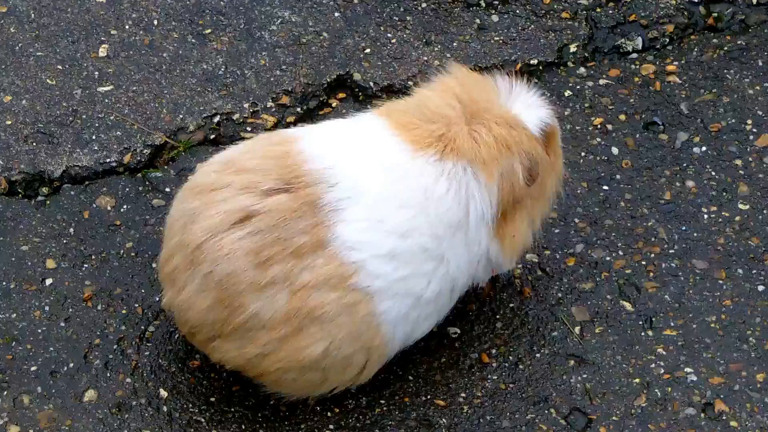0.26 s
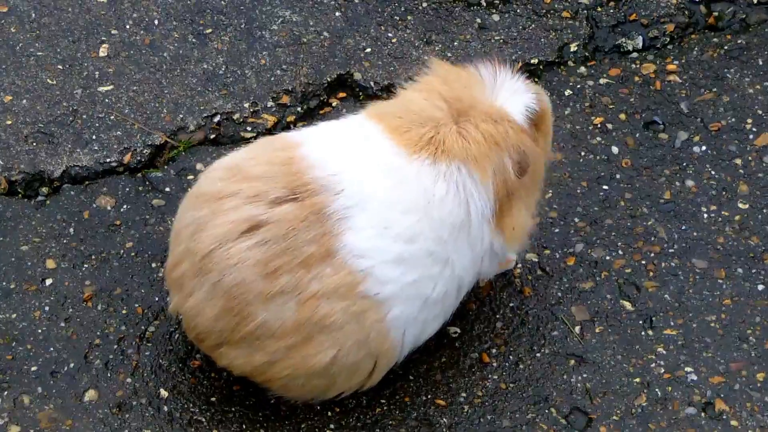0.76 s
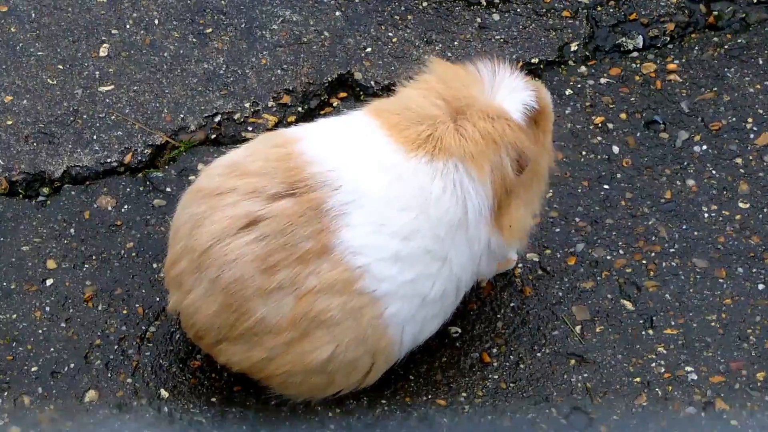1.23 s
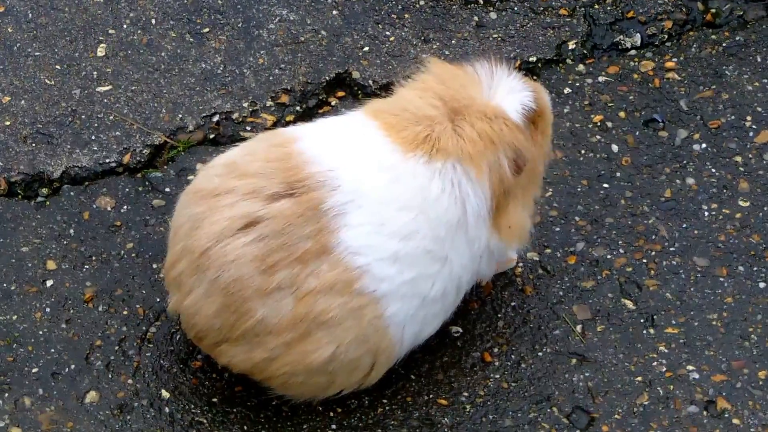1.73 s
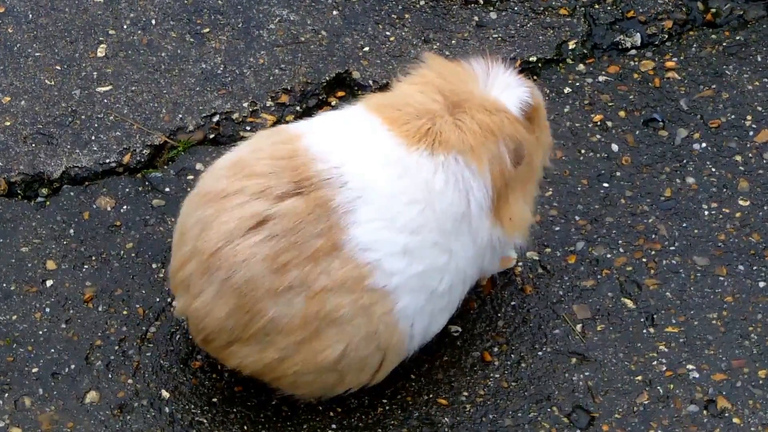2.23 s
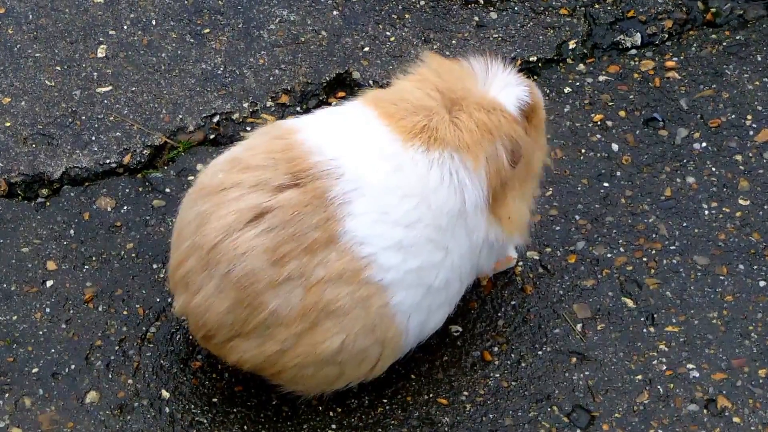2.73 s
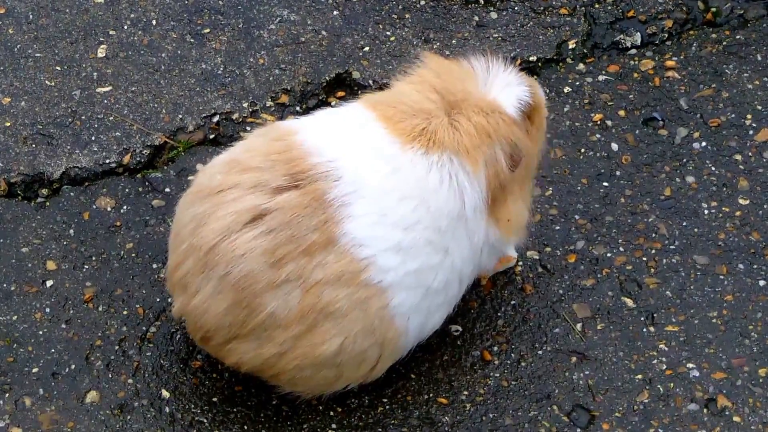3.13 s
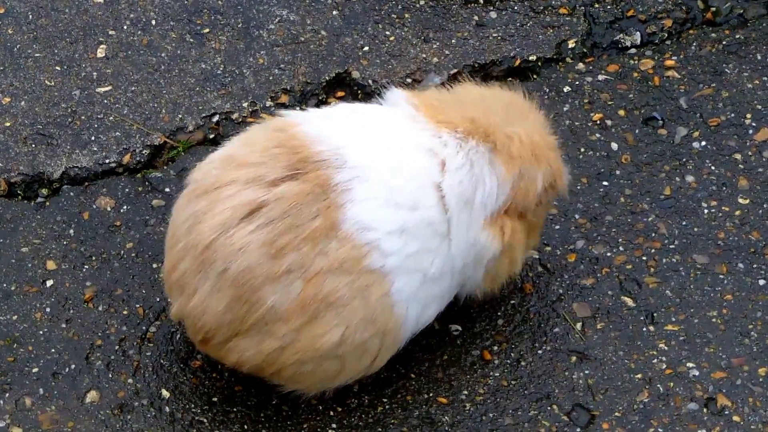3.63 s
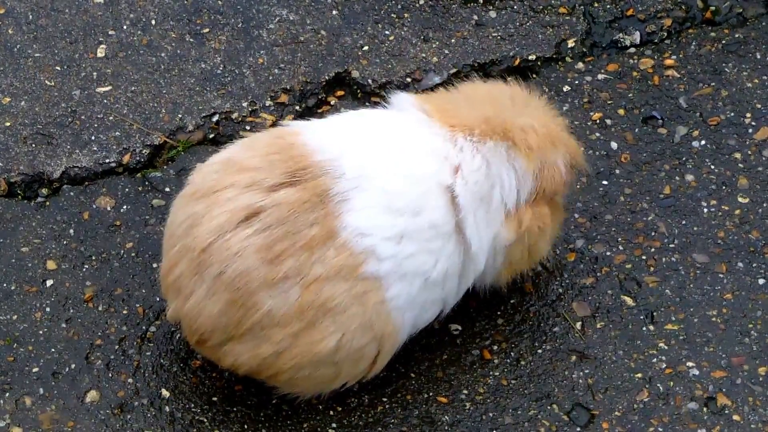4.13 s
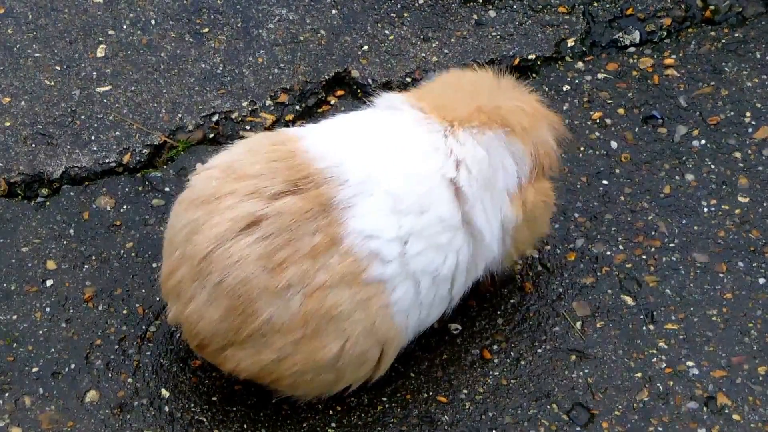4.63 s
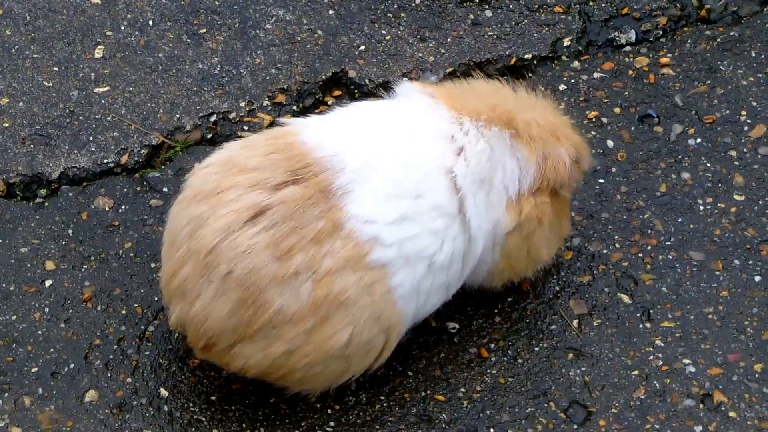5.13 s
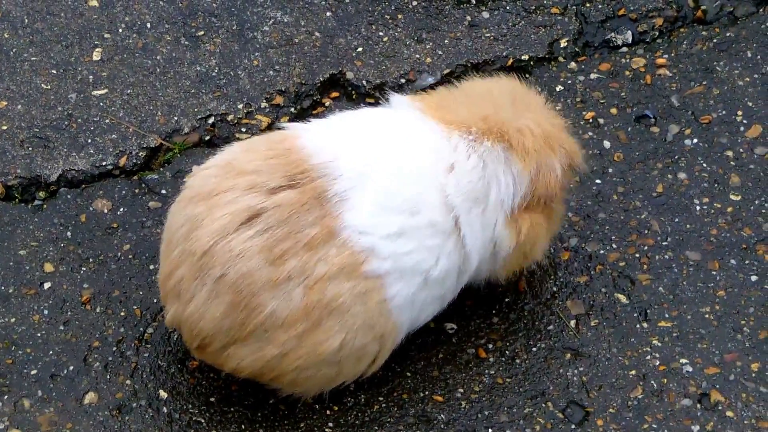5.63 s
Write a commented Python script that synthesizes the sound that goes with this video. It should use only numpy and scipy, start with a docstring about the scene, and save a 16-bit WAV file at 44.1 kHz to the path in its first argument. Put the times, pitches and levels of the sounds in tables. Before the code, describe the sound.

A quiet outdoor scene among houses is heard from a hand-held camera, with a soft, steady hiss throughout. In the first second, gulls cry faintly far away and fingers rustle and tick right at the microphone; the distant calls return now and then. From about 1.1 seconds a small songbird repeats a high whistled pip, fast trill and falling slur, roughly four times a second, echoing lightly off the walls until about 5.5 seconds. Five high, buzzy, warbling squeals, like young birds begging, each rise in pitch and last about a third of a second, at 1.0, 1.4, 2.2, 3.4 and 4.9 seconds. The grip scrapes, crackles and softly knocks hardest from 3.4 to 4.2 seconds, then continues more lightly, with the sharpest tick at 5.3 seconds. From 5.5 to 5.8 seconds a bird gives a swelling, rattling churr of quick pulses, followed by one last faint chirp.

```python
"""Outdoors among houses, heard from the microphone of a hand-held camera, with birds near and far.
First come soft hiss, fingers rustling and ticking on the camera, and gulls crying far off.
From one second in come five high, buzzy, warbling squeals, like young starlings begging,
while a small songbird repeats a whistled pip, trill and falling slur that the walls echo.
Past halfway the grip scrapes hardest; at the end a bird gives a rattling churr of quick pulses."""
import sys
import numpy as np
from scipy import signal
from scipy.fft import rfft, irfft, next_fast_len
from scipy.io import wavfile
from scipy.ndimage import uniform_filter1d

SR = 44100
rng = np.random.default_rng(int(sys.argv[2]) if len(sys.argv) > 2 else 0)


def store_pcm(level_fs):
    """Save levels as 16-bit WAV."""
    pcm = np.round(np.clip(level_fs, -1, 1) * 32767).astype(np.int16)
    wavfile.write(sys.argv[1], SR, np.atleast_2d(pcm).T)


N = 258867
TIME = np.arange(N) / SR


def amp(db):
    return 10 ** (np.asarray(db) / 20)


def unit_rms(x):
    return x / np.sqrt(np.mean(x ** 2) + 1e-20)


def value_at(points, hz):
    """Reads a curve of (hz, value) points on a log frequency axis."""
    point_hz, value = np.transpose(points)
    return np.interp(np.log(hz + 1), np.log(point_hz + 1), value)


def colour(x, points):
    """Filters x by a spectrum of (hz, db) points."""
    size = next_fast_len(2 * len(x))
    gain = amp(value_at(points, np.fft.rfftfreq(size, 1 / SR)))
    return irfft(rfft(x, size) * gain, size)[:len(x)]


def wander(size, per_s):
    """Smooth random drift of rms about 1, changing about per_s times a second."""
    spectrum = rfft(rng.standard_normal(SR)) * np.exp(-(np.arange(SR // 2 + 1) / per_s) ** 2)
    return np.resize(unit_rms(irfft(spectrum)), size)


def follow(rows):
    """The times of a curve and its columns, sample by sample."""
    times, *columns = np.transpose(rows)
    t = np.arange(times[0], times[-1], 1 / SR)
    return t, *(np.interp(t, times, column) for column in columns)


def phase_of(hz):
    return 2 * np.pi * np.cumsum(hz) / SR


def fade(size, share):
    return signal.windows.tukey(size, share)


def envelope(t, length_s, attack_s, release_s):
    return np.clip(t / attack_s, 0, 1) * np.clip((length_s - t) / release_s, 0, 1)


def add(mix, start_s, sound):
    part = mix[max(round(start_s * SR), 0):][:len(sound)]
    part += sound[:len(part)]


def play(sounds):
    mix = np.zeros(N)
    for start_s, sound in sounds:
        add(mix, start_s, sound)
    return mix


# Decay of the echo between the houses: frequency_hz, t60_s
HOUSE_DECAY = [(500, 0.34), (4000, 1), (10000, 0.34)]
def yard(x, near_db, far_db, near_s=0.0034):
    """Sparse reflections: a quick scatter from near walls, a longer tail from the houses around."""
    taps = rng.standard_normal((2, SR)) * (rng.random((2, SR)) < 2000 / SR)
    near = taps[0] * np.exp(-TIME[:SR] / near_s) * (TIME[:SR] > .002)
    hz, t, spectra = signal.stft(taps[1], SR, nperseg=256)
    decay = amp(-60 * t / value_at(HOUSE_DECAY, hz)[:, None])
    far = signal.istft(spectra * decay * np.minimum(t / 0.017, 1), SR)[1][:SR]
    echo = amp(near_db) * near / np.linalg.norm(near) + amp(far_db) * far / np.linalg.norm(far)
    return (x + signal.fftconvolve(x, echo)[:N]) / np.sqrt(1 + np.sum(echo ** 2))


# Spectrum of the noise floor: frequency_hz, relative_db
HISS_COLOUR = [(15, -31), (28, -3), (60, -9.5), (130, -16.5), (200, -18), (320, -17), (545, -13),
               (850, -16.5), (1130, -11.5), (1500, -16.5), (5000, -17), (8600, -11.5), (11600, -21),
               (16000, -21)]
def hiss(level_db=-59.5):
    """Steady outdoor air and microphone hiss."""
    return amp(level_db) * unit_rms(colour(rng.standard_normal(N), HISS_COLOUR))


# Faint rasping birds in the distance: start_s, length_s, centre_hz, level_db
FAR_RASPS = [(.56, 0.071, 1836, -65), (2.597, 0.092, 3500, -62), (4.931, 0.041, 8350, -56.5),
             (5.449, 0.024, 4030, -57), (5.486, 0.022, 8700, -59)]
def rasp(start_s, length_s, centre_hz, level_db, width=0.16):
    """A toneless burst of noise around one pitch."""
    size = round(length_s * SR)
    band = wander(size, width * centre_hz) * np.sin(2 * np.pi * centre_hz * TIME[:size])
    return start_s, amp(level_db) * unit_rms(band * fade(size, 0.66))


# Gulls and other birds far off: start_s, length_s, top_hz, bend_ratio, level_db, octave_relative_db
FAR_CRIES = [(0, 0.12, 3550, .02, -68, -30), (.019, 0.054, 1230, 0.11, -59, -7),
             (0.37, 0.04, 5610, 0.046, -60.5, -30), (.385, 0.0545, 1294, 0.078, -61.5, -15),
             (0.478, 0.072, 1225, 0.077, -57, -10.5), (.47, 0.13, 1210, 0.029, -62, 0),
             (0.628, 0.17, 1150, 0.026, -65, 5), (0.972, 0.054, 1260, 0.087, -63.5, -15),
             (1.097, 0.03, 1176, 0.067, -59.5, -26), (1.5, 0.15, 1206, 0.014, -58.5, -15),
             (1.803, 0.031, 1320, 0.13, -61.5, -24), (2.519, 0.066, 1424, 0.11, -65, 1),
             (2.56, 0.097, 1145, 0.019, -65, -4), (2.674, 0.031, 2280, 0.035, -60.5, -30),
             (2.766, 0.04, 2280, 0.045, -61.5, -28), (2.884, 0.033, 2315, .03, -61.5, -30),
             (3.263, 0.043, 1374, 0.17, -62, -5), (4.245, 0.036, 1170, 0.047, -61.5, -20),
             (5.208, 0.036, 1409, 0.17, -62.5, -2), (5.32, .045, 1240, 0.065, -60, -32)]
def cry(start_s, length_s, top_hz, bend, level_db, octave_db, peak_share=0.332):
    """A distant note with its octave that arches early and falls away."""
    progress = np.linspace(0, 1, round(length_s * SR))
    hz = top_hz * (1 - bend * (2 * (progress - peak_share)) ** 2)
    phase = phase_of(hz * (1 + 0.0078 * wander(len(hz), 130)))
    tone = np.sin(phase) + amp(octave_db) * np.sin(2 * phase)
    return start_s, amp(level_db) * unit_rms(tone * fade(len(hz), 0.23))


def slips(per_s, spread_db=5.0):
    """Sliding skin: a random train of clicks, most small and a few large."""
    sizes = amp(spread_db * np.minimum(rng.exponential(1, N), 4)) * rng.choice([-1, 1], N)
    return unit_rms(sizes * (rng.random(N) < per_s / SR))


# Spectra of a light touch, a firm touch and their crackle: frequency_hz, relative_db
LIGHT_TOUCH = [(40, -27), (110, -8), (190, 5), (260, -3.5), (450, -7), (700, -11), (1100, -14), (1800, -12),
               (7000, -35), (15000, -76)]
FIRM_TOUCH = [(40, -48), (120, -74), (220, -3.5), (430, -7.5), (700, -14.5), (1100, -19.5), (1800, -32.5),
              (7000, -88), (15000, -40)]
CRACKLE_COLOUR = [(300, 14), (1200, 9), (3000, 22.5), (7000, 12.5), (11000, -2.5), (15500, 0.5)]
# The grip shifts, right at the microphone: start_s, length_s, rub_db, crackle_relative_db
GRIP_SHIFTS = [(0, 0.17, -60, -52), (0.678, 0.066, -62, -66), (0.796, 0.15, -57.5, -63),
               (0.969, .29, -57.5, -54), (1.653, 0.36, -57.5, -44), (2.019, 0.17, -67, -50.5),
               (3.405, 0.27, -52.5, -45), (3.651, 0.31, -47, -45), (3.958, .27, -52.5, -46),
               (4.308, 0.49, -55.5, -46.5), (4.889, 0.36, -57, -52), (5.304, 0.077, -60, -52),
               (5.442, .28, -63, -66)]
def rubbing(resting_db=-75.5, firm_db=-49, grit_db=-19, resting_grit_db=-78, catches_per_s=43):
    """Fingers creep on the camera body: a light touch mumbles, a firm one scrapes and crackles."""
    level, crackle = amp(resting_db), amp(resting_grit_db)
    for start_s, length_s, rub_db, crackle_db in GRIP_SHIFTS:
        shift = envelope(TIME - start_s, length_s, attack_s=0.0027, release_s=0.035)
        level = level + shift * amp(rub_db)
        crackle = crackle + shift * amp(crackle_db + grit_db)
    drift = colour(rng.standard_normal(N), [(0, 0), (catches_per_s, 0), (2 * catches_per_s, -80)])
    catch = amp(5 * np.minimum(unit_rms(drift), 1))  # the fingers catch and let go
    level = level * catch
    firmness = 1 / (1 + (amp(firm_db) / level) ** 2)
    friction = slips(per_s=1100) + 0.32 * rng.standard_normal(N)
    mumble = (1 - firmness) * unit_rms(colour(friction, LIGHT_TOUCH))
    scrape = firmness * unit_rms(colour(friction, FIRM_TOUCH))
    grit = unit_rms(colour(slips(per_s=400), CRACKLE_COLOUR))
    return level * (mumble + scrape) + crackle * catch * grit


# The firmest knocks of the grip: start_s, crackle_peak_db, thud_db
GRIP_KNOCKS = [(.052, -40, -77), (0.375, -51, -66), (0.8936, -40.5, -54.5), (.97, -42, -60.5),
               (.995, -43, -55.5), (1.017, -45, -60), (1.0382, -43, -47.5), (1.664, -40, -55),
               (1.864, -43, -59), (1.895, -41, -56.5), (3.418, -41, -49.5), (3.439, -40, -45.5),
               (3.476, -40, -58), (3.543, -41, -44.5), (3.586, -39.5, -48.5), (3.672, -56, -50),
               (3.732, -35, -51), (3.755, -37.5, -44), (3.822, -49, -53), (3.965, -39, -45.5),
               (3.999, -37.5, -49), (4.047, -37, -57.5), (4.095, -41, -49), (4.377, -42, -53.5),
               (4.487, -42, -54.5), (4.537, -43, -47.5), (4.718, -51, -54.5), (4.749, -35, -60),
               (4.954, -38.5, -70), (5.058, -56, -54), (5.122, -56, -57.5), (5.208, -44, -66),
               (5.368, -39.5, -64), (5.564, -61, -64)]
def knock(start_s, crackle_db, thud_db, thud_s=0.0025, crackle_s=0.0015, thud_hz=400, scrape=0.86):
    """A firmer slip: a dull push rocks the housing for a few cycles, with a short crackle."""
    t = TIME[:SR // 30]
    push, grit = rng.standard_normal((2, len(t)))
    rock = np.sin(2 * np.pi * (thud_hz * rng.uniform(0.886, 1.274) * t + rng.random()))
    thud = (rock + scrape * unit_rms(colour(push, FIRM_TOUCH))) * t * np.exp(-t / thud_s)
    band = signal.butter(2, [900, 4500], "band", fs=SR, output="sos")
    crackle = signal.sosfilt(band, grit * t * np.exp(-t / crackle_s))
    return start_s, amp(thud_db) * unit_rms(thud) + amp(crackle_db) * crackle / abs(crackle).max()


# The sharpest ticks on the camera body: start_s, peak_db, ring_hz
BODY_TICKS = [(.529, -37, 4400), (.82, -36, 2970), (1.172, -37, 5000), (1.865, -37, 10300),
              (3.141, -37.5, 6700), (3.473, -37.5, 6850), (3.64, -36, 4440), (3.798, -31.5, 10800),
              (3.899, -36.5, 6960), (3.924, -41, 8270), (4.004, -39, 8100), (4.098, -33, 6990),
              (4.488, -44, 10900), (4.682, -37, 5850), (4.847, -36, 6300), (4.957, -33.5, 7000),
              (5.051, -30.5, 9130), (5.2943, -26.5, 8850), (5.359, -34.5, 6740)]
def tick(start_s, peak_db, ring_hz, ring_s=0.00045, grit=1.44):
    """A tiny hard contact: a burst of bright grit that rings for an instant."""
    t = TIME[:SR // 80]
    spray = unit_rms(np.diff(rng.standard_normal(len(t) + 1)) + 2.0 * rng.standard_normal(len(t)))
    click = (np.sin(2 * np.pi * ring_hz * t) + grit * spray) * t * np.exp(-t / ring_s)
    return start_s, amp(peak_db) * click / abs(click).max()


def small_contacts(spread_db=3):
    """Lesser knocks and ticks fall at random in each shift of the grip, as strong as the shift is."""
    def scatter(per_s):
        for start_s, length_s, rub_db, crackle_db in GRIP_SHIFTS:
            count = round(length_s * per_s)
            for k, (place, size) in enumerate(rng.random((32, 2))[:count]):
                at_s = start_s + length_s * (k + place) / count
                chance_db = spread_db * (2 * size - 1)
                yield at_s, rub_db + chance_db, crackle_db + chance_db
    knocks = [knock(at_s, crackle_db, rub_db - 5) for at_s, rub_db, crackle_db in scatter(per_s=13)]
    ticks = [tick(at_s, crackle_db + 2, ring_hz=8000) for at_s, _, crackle_db in scatter(per_s=11)]
    return play(knocks + ticks)


def chirp(start_s, pip_hz, pip_db, trill_hz, trill_db, pip_s=.014, trill_s=0.0643, trills_per_s=205):
    """The songbird's pure pip, then a lower note with a very fast trill that flutters and fades."""
    pip_size, size = round(pip_s * SR), round(trill_s * SR)
    pip = np.sin(phase_of(np.full(pip_size, pip_hz))) * fade(pip_size, 0.13)
    from_middle = np.linspace(-.5, .5, size)
    swing = np.sin(phase_of(trills_per_s * (1 + .1 * wander(size, 80))))
    phase = phase_of(trill_hz + 230 * swing + 60 * wander(size, 150) - 120 * from_middle)
    flutter_db = 2.5 * wander(size, 60) - 7 * from_middle
    trill = (np.sin(phase) + amp(-20) * np.sin(2 * phase)) * fade(size, 0.23) * amp(flutter_db)
    return start_s, np.concatenate([amp(pip_db) * unit_rms(pip), amp(trill_db) * unit_rms(trill)])


# Course of the songbird's slur: time_s, pitch_hz, relative_db
SLUR_CURVE = [(0, 3228, -21), (.012, 3060, -9), (.035, 2750, -6.5), (.055, 2790, -9.5), (.075, 2750, -34)]
def slur(start_s, gain_db):
    """A clean whistle that slides down and levels out."""
    t, hz, shape_db = follow(SLUR_CURVE)
    whistle = np.sin(phase_of(hz * (1 + 0.0098 * wander(len(t), 100))))
    return start_s, amp(gain_db + shape_db) * unit_rms(whistle) * fade(len(t), 0.4)


# The songbird's phrases, about four a second: start_s, trill_hz, pip_db, trill_db, slur_gain_db
SONG_PHRASES = [(1.114, 4470, -73, -52, -76), (1.359, 4580, -62, -48.5, -50.5),
                (1.629, 4234, -49, -51.5, -52.5), (1.895, 4144, -56, -53, -48.5),
                (2.143, 4166, -49, -47, -49.5), (2.398, 4190, -54.5, -52, -54.5),
                (2.656, 4205, -62, -53, -53), (2.913, 4206, -52.5, -53, -51),
                (3.18, 4150, -59.5, -52.5, -54.5), (3.687, 4270, -52, -59.5, -47),
                (3.956, 4203, -57, -51.5, -68), (4.224, 4080, -60, -55, -57), (4.49, 4123, -68, -56, -65),
                (4.763, 4174, -49, -54.5, -54), (5.02, 4190, -57, -54.5, -50.5),
                (5.296, 4040, -53, -53.5, -62), (5.816, 4560, -78, -57, -72)]
def songbird(pip_ratio=1.283, slur_delay_s=.163):
    """Each phrase is a pip, a trill and, after a short pause, a falling slur, echoed by the walls."""
    chirps = [chirp(start_s, pip_ratio * hz, pip_db, hz, trill_db)
              for start_s, hz, pip_db, trill_db, _ in SONG_PHRASES]
    slurs = [slur(start_s + slur_delay_s, gain_db) for start_s, *_, gain_db in SONG_PHRASES]
    return yard(play(chirps), near_db=-4, far_db=-6.5) + yard(play(slurs), near_db=-12, far_db=-9)


# A bird's rattling churr of quick pulses: time_s, level_db, pulses_per_s
CHURR_CURVE = [(5.505, -62, 87), (5.54, -52, 93), (5.57, -48.5, 81), (5.62, -46, 85), (5.69, -44, 88),
               (5.755, -44.5, 92), (5.775, -51.5, 110), (5.795, -58, 88)]
# Its tone colour: frequency_hz, relative_db
CHURR_TONE = [(1000, -14), (1450, -11.5), (1700, -1), (2100, -4.5), (2350, -10.5), (2750, 6.5), (3050, 2),
              (4200, -11), (5600, -2.5), (6700, -2), (7400, -9), (12000, -37)]
def churr(low_hz=1550, high_hz=3100, pulse_s=0.0062, overtone_db=-13, roughness=0.51):
    """A rattle of short uneven pulses, each a rasping upward sweep."""
    t, level_db, rate = follow(CHURR_CURVE)
    progress = np.linspace(0, 1, round(pulse_s * SR))
    sweep_hz = low_hz + (high_hz - low_hz) * progress ** 2
    cycles = np.cumsum(rate * (1 + .08 * wander(len(t), 60))) / SR
    pulses = np.zeros(len(t))
    for onset in np.flatnonzero(np.diff(np.floor(cycles))):
        phase = phase_of(sweep_hz * (1 + 0.076 * rng.standard_normal()))
        tone = np.sin(phase) + amp(overtone_db) * (np.sin(2 * phase) + np.sin(3 * phase))
        noise = roughness * rng.standard_normal(SR // 20)[:len(tone)]
        add(pulses, onset / SR, (tone + noise) * np.sin(np.pi * progress))
    return t[0], amp(level_db) * unit_rms(colour(pulses, CHURR_TONE))


# Resonances that colour the squealing bird's voice: frequency_hz, relative_db
VOICE_RESONANCES = [(1600, 1), (2200, -11.5), (2580, -4), (3200, 9), (3800, 7), (4500, 8.5), (5400, 2),
                    (6600, 9.5), (7500, 4.5), (8600, 8), (10000, -7.5), (13000, -15)]
# Buzzy squeals, like young starlings begging: start_s, length_s, climb_s, top_hz, warbles_per_s,
# fundamental_db, octave_db, upper_harmonics_db, upper_gain_db_per_khz (of climb)
BIRD_SQUEALS = [(1.036, .32, 0.14, 2473, 48, -50, -56.5, -61.5, 0),
                (1.386, 0.29, 0.15, 2230, 62, -58.5, -52, -52, -14),
                (2.19, .26, 0.1, 2228, 62, -58.5, -53.5, -57, -8),
                (3.381, .28, .125, 2237, 66, -63, -56.5, -57.5, -29),
                (4.944, 0.28, 0.13, 2354, 52, -51, -54.5, -53.5, 12)]
def squeal(start_s, length_s, climb_s, top_hz, warbles_per_s, fundamental_db, octave_db,
           upper_db, upper_db_per_khz, onset_hz=1759, sag_hz=250, warble_depth=.062, throb=.35):
    """A bird's shrill, hoarse voice climbs and sags; its warble sweeps harmonics across resonances."""
    t = TIME[:round(length_s * SR)]
    climb = np.minimum(t / climb_s, 1) ** 1.4
    hz = onset_hz + (top_hz - onset_hz) * climb - sag_hz * (t / length_s) ** 4
    warble_hz = warbles_per_s * (top_hz / hz) ** 0.671  # slows as the pitch climbs
    warble = np.sin(phase_of(warble_hz * (1 + 0.087 * wander(len(t), 30.6))))
    warble *= 1 - np.exp(-t / .02)
    pitch_hz = hz * (1 + warble_depth * warble + .016 * wander(len(t), 500))
    phase = phase_of(pitch_hz)
    hoarseness = 1 + amp(-10) * wander(len(t), 310)
    strength = (1 + throb * warble) * hoarseness * envelope(t, length_s, attack_s=0.027, release_s=0.033)
    harmonics = [amp(value_at(VOICE_RESONANCES, k * pitch_hz)) * np.sin(k * phase) * strength
                 for k in range(1, 7)]
    upper = sum(harmonics[2:]) * np.minimum((length_s - t) / 0.052, 1)  # these die away first
    from_top_khz = (hz - top_hz) / 1000
    # the climb strengthens the fundamental most
    parts = [(harmonics[0], fundamental_db, 26), (harmonics[1], octave_db, -1),
             (upper, upper_db, upper_db_per_khz)]
    return start_s, sum(amp(level_db) * unit_rms(part * amp(db_per_khz * from_top_khz))
                        for part, level_db, db_per_khz in parts)


def scene():
    """One microphone: the birds come with the walls' echo, the handling and hiss without."""
    squeals = yard(play(squeal(*row) for row in BIRD_SQUEALS), near_db=-4, far_db=-12)
    rattle = yard(play([churr()]), near_db=-3.5, far_db=-21)
    far_calls = [cry(*row) for row in FAR_CRIES] + [rasp(*row) for row in FAR_RASPS]
    far_birds = yard(play(far_calls), near_db=-10.5, far_db=-11.5)
    handling = rubbing() + small_contacts()
    handling += play([knock(*row) for row in GRIP_KNOCKS] + [tick(*row) for row in BODY_TICKS])
    return (squeals + rattle + songbird() + far_birds + handling + hiss())[None]


# Moments when the level dips briefly: centre_s, length_s
LEVEL_DIPS = [(.3, 0.0058), (.907, 0.0066), (3.431, .013), (3.47, 0.0041), (3.541, 0.006), (3.961, 0.0104),
              (4.421, 0.0072), (5.327, 0.0031)]
# The recorder's narrow stop bands: centre_hz, q
STOP_BANDS = [(300, 3), (900, 9)]
def record(dry, dip_db=36, edge_hz=16000):
    """The level dips briefly now and then; two narrow notches and the band limit follow."""
    dipping = sum(1.0 * (abs(TIME - centre_s) < length_s / 2) for centre_s, length_s in LEVEL_DIPS)
    x = dry * amp(-uniform_filter1d(dip_db * dipping, size=50))
    for hz, q in STOP_BANDS:
        x = signal.lfilter(*signal.iirnotch(hz, q, fs=SR), x)
    lowpass = signal.firwin(511, edge_hz, window=("kaiser", 9), fs=SR)
    return signal.oaconvolve(x, lowpass[None], "same")


dry = scene()
out = record(dry)
store_pcm(out)
```